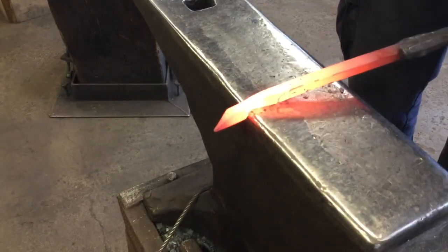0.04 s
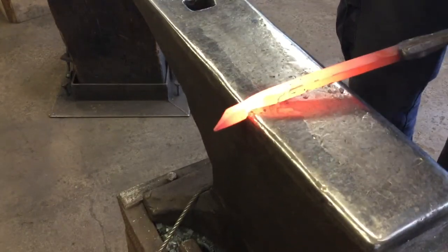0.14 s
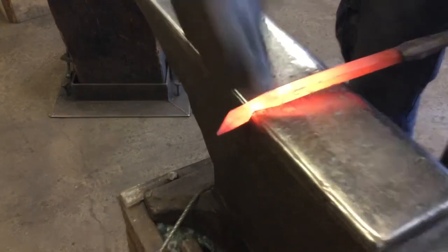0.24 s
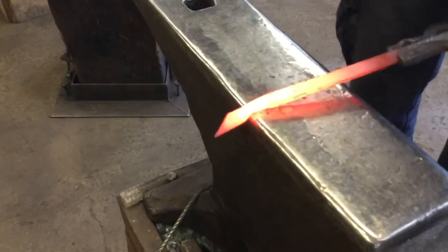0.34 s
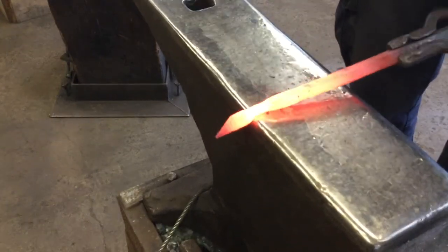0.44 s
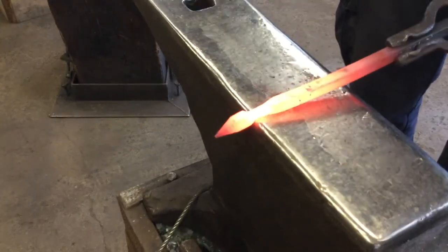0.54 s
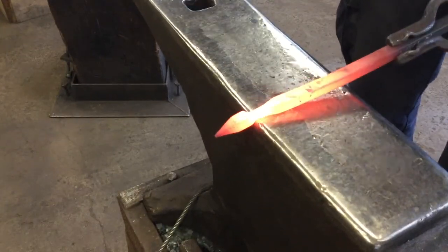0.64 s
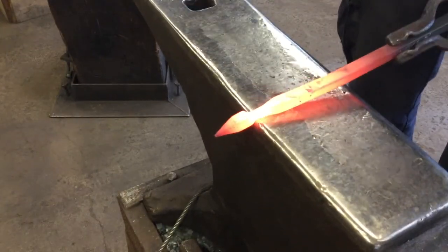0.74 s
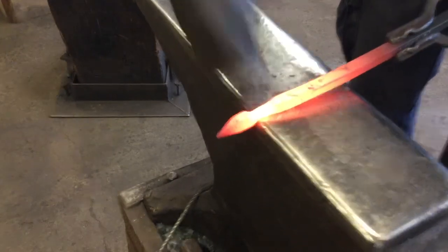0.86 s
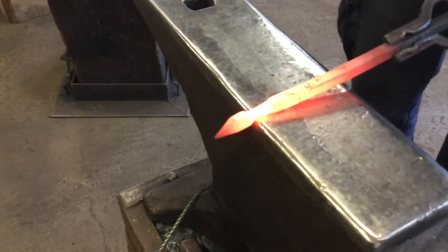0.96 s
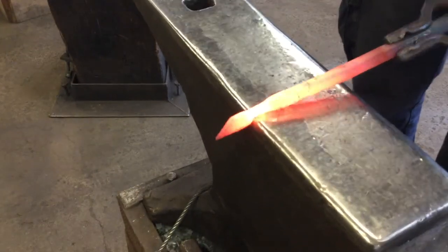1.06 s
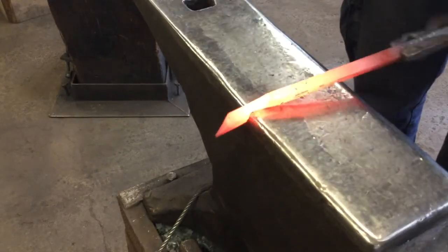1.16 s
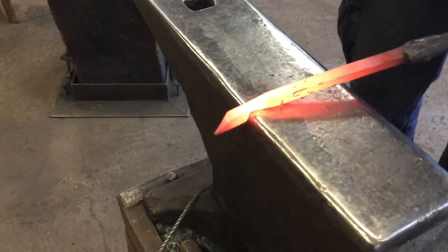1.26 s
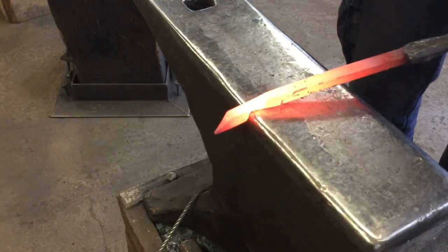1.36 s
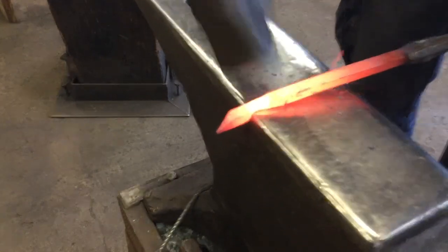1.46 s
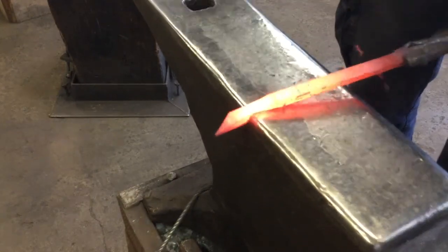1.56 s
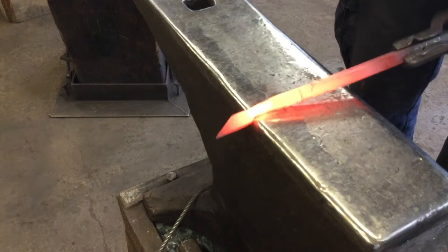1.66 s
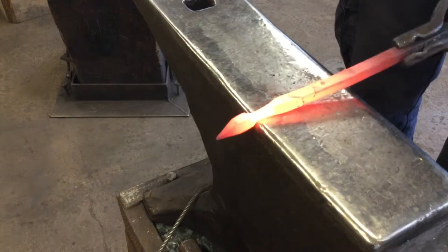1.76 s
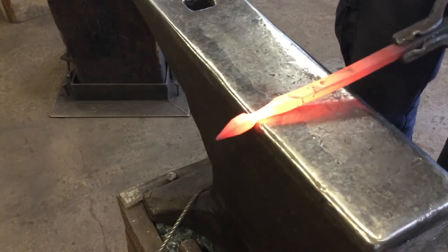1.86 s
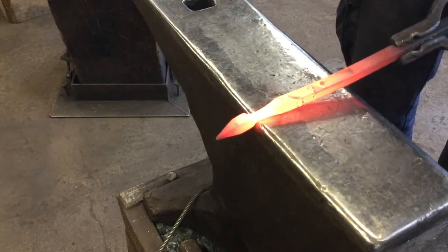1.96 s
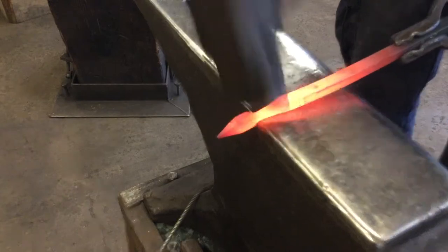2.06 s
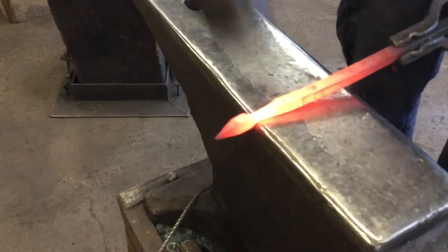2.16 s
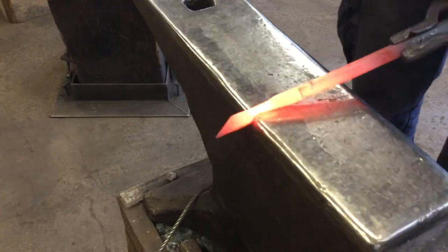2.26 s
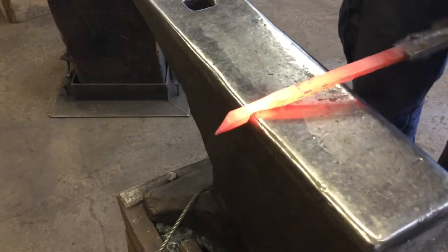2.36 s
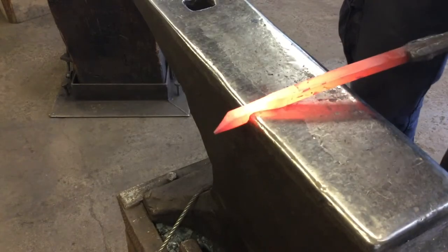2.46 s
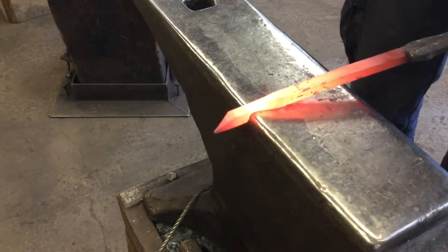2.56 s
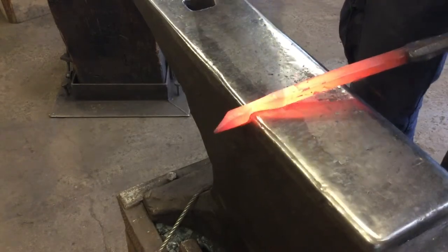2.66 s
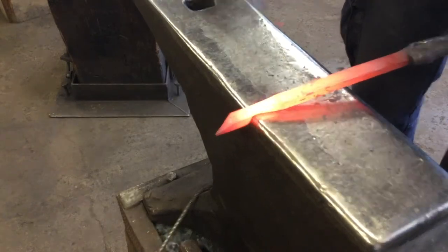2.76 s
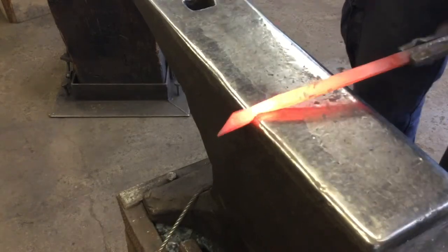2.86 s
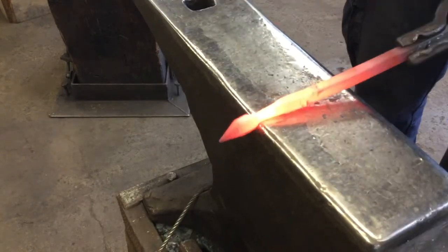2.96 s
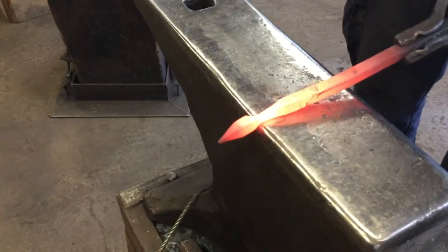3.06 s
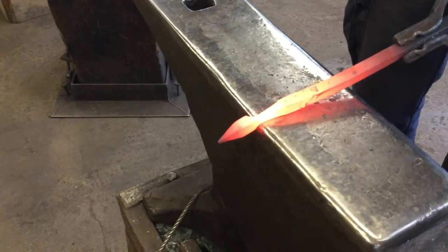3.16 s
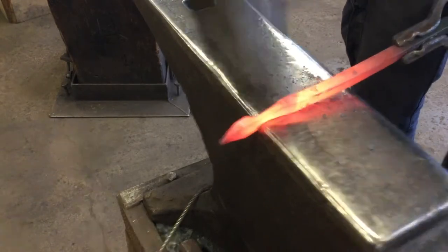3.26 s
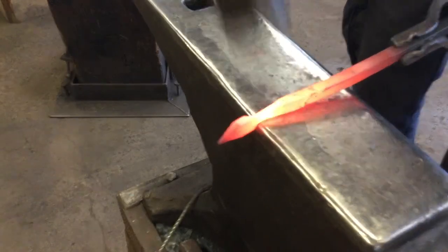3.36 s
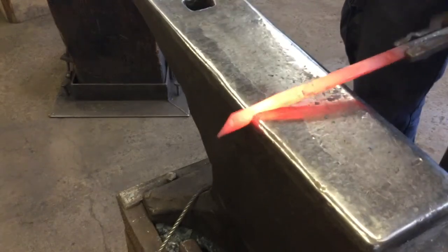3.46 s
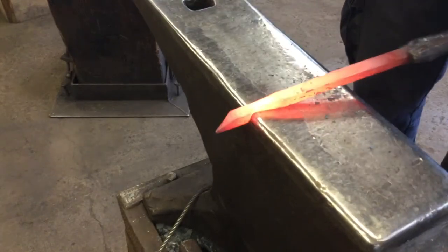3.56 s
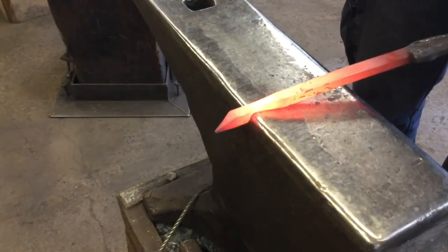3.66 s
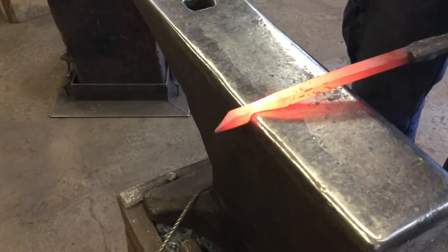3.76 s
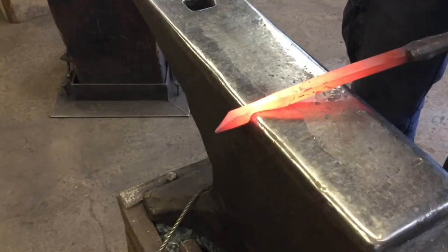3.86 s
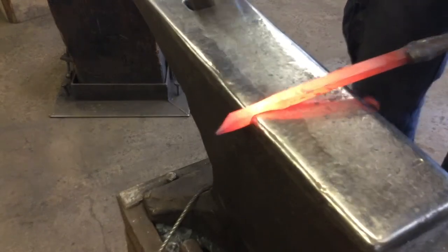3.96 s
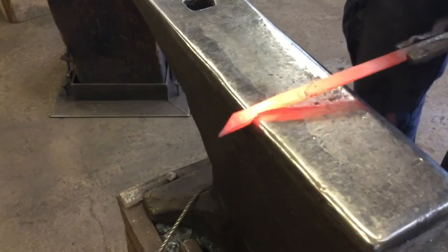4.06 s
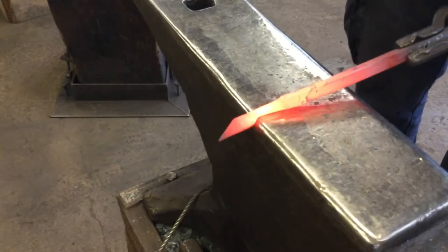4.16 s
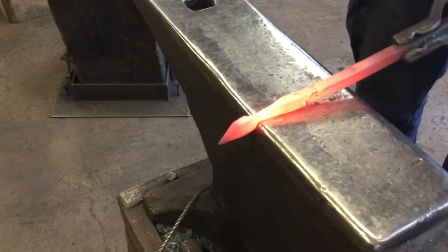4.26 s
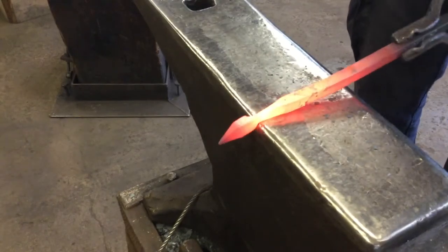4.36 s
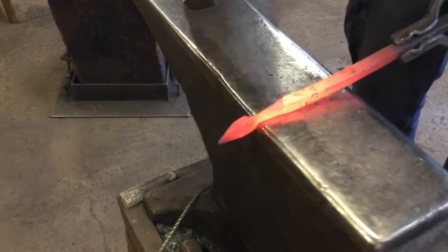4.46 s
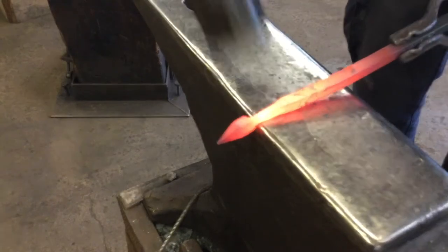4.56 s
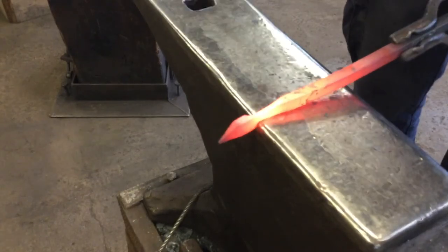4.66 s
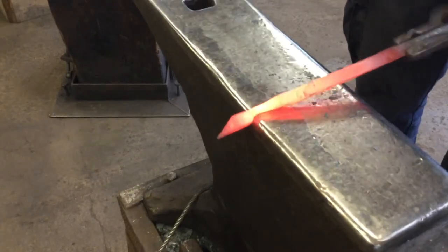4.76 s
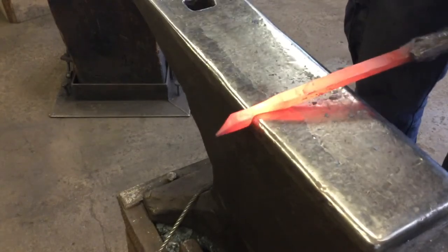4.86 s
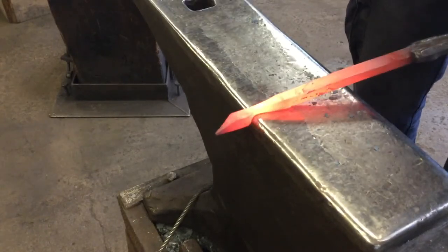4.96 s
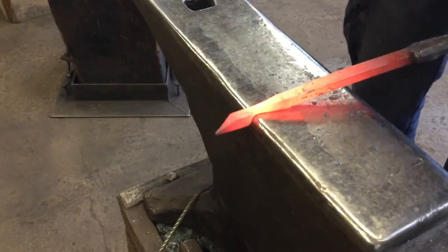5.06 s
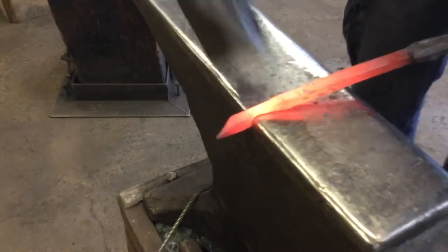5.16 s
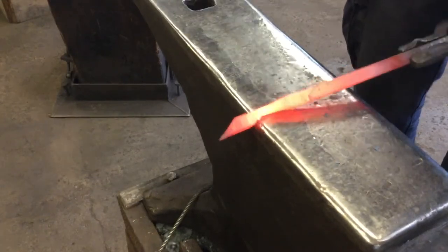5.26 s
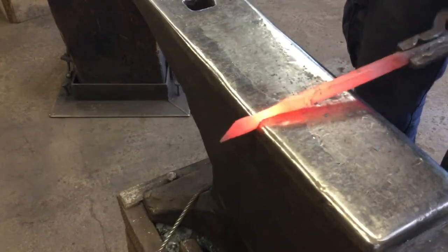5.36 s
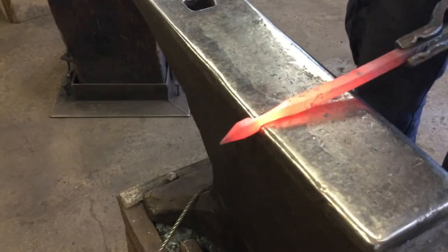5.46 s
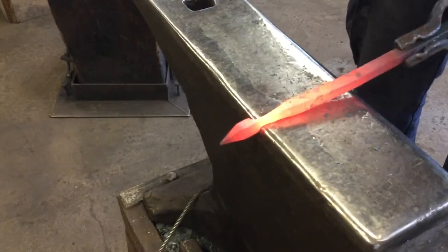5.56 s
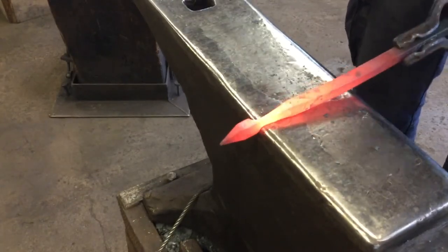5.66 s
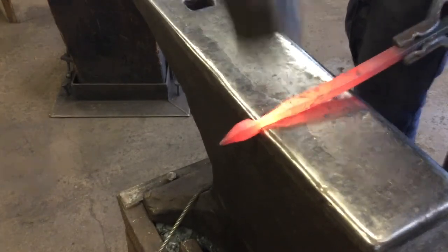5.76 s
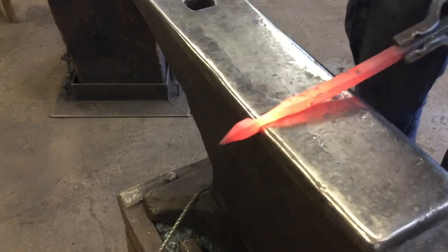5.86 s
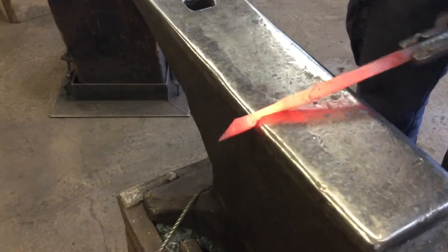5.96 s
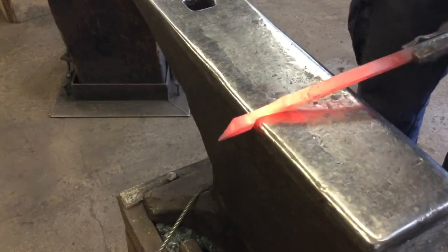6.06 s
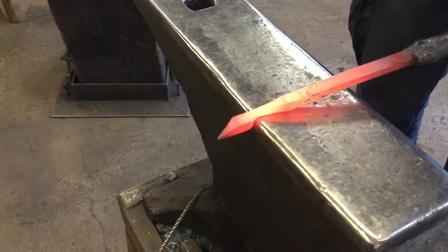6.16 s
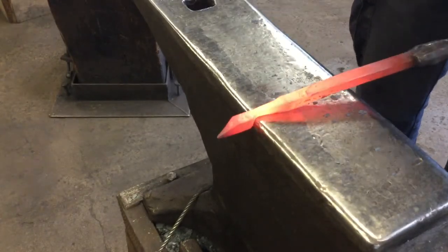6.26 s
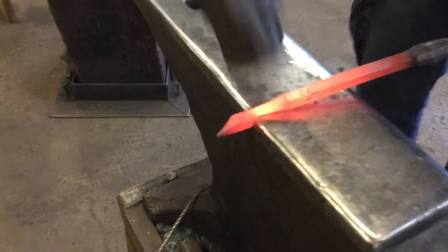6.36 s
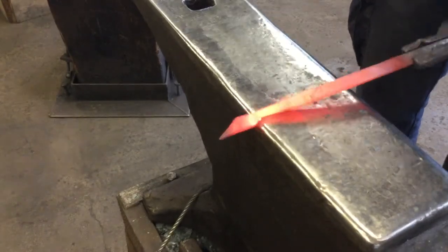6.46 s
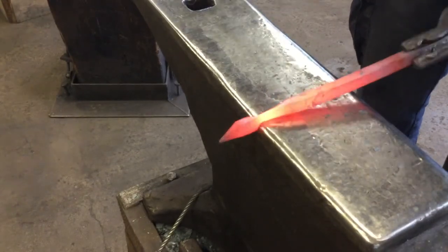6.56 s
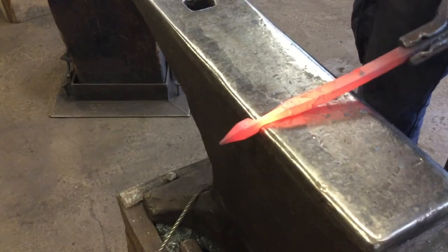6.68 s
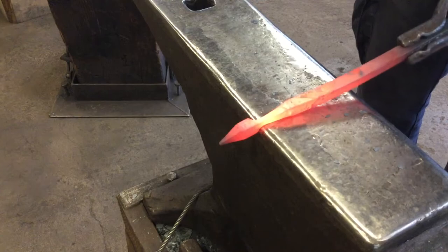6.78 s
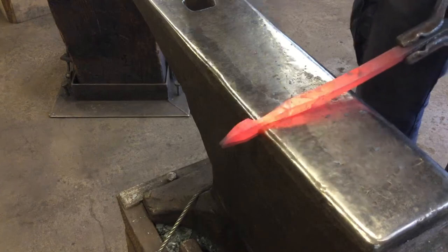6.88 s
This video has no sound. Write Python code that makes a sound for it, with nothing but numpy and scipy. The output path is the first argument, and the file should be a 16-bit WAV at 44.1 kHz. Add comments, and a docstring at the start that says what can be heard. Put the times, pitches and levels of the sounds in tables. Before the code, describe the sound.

A hand hammer pounds a hot steel bar on an anvil, eleven evenly spaced blows a little over half a second apart. Each lands with a sharp crack, a short clang, thin high rings and a thud from the stand. The hard workshop walls add a brief echo, and a blower hums low underneath. The close microphone overloads slightly on every hit.

```python
"""In a hard-walled workshop with a humming blower, a smith draws out a glowing steel bar on an anvil.
Each evenly paced hammer blow is an impact: the contact cracks and crunches the scale, the steel vibrates
freely in a short clang and thin high rings, and the stand thuds. The walls return it as echoes and
reverberation. The close microphone overloads on every blow, and its limiter ducks and recovers."""
import sys
import numpy as np
from scipy import signal
from scipy.fft import rfft, irfft, next_fast_len
from scipy.io import wavfile
from scipy.ndimage import minimum_filter1d

SR = 44100
rng = np.random.default_rng(int(sys.argv[2]) if len(sys.argv) > 2 else 0)


def transcribe(u):
    """Save the signal u as a 16-bit wav file named by the first command-line argument.

    u: samples, shape (n,) or (channels, n), limited to [-1, 1]; the rate is SR.
    q: integer samples, one column per channel.
    """
    v = np.clip(np.atleast_2d(u).T, -1, 1)
    q = np.round(v * 32767).astype(np.int16)
    wavfile.write(sys.argv[1], SR, q)


N = 305172
TIME = np.arange(N) / SR
LEAD_IN = SR  # samples before time zero, so that an earlier blow is still dying away


def from_db(db):
    """Amplitude ratio of a level in decibels."""
    return 10 ** (np.asarray(db) / 20)


def rms_one(x):
    """Normalisation to rms 1."""
    return x / np.sqrt(np.mean(x ** 2) + 1e-20)


def at_hz(points, hz, axis=1):
    """Interpolation of one table column over log frequency."""
    points = np.array(points)
    return np.interp(np.log(np.maximum(hz, 1)), np.log(points[:, 0]), points[:, axis])


def decay(t, t60):
    """Exponential damping, 60 dB down after t60."""
    return np.exp(-np.log(1000) * t / t60)


def bump(t, centre_s, spread_s):
    """Gaussian pulse of height 1."""
    return np.exp(-((t - centre_s) / spread_s) ** 2)


def swell(t, rise_s):
    """Gaussian onset from 0 to 1."""
    return 1 - bump(t, 0, rise_s)


def coloured(spectrum):
    """Spectral shaping of white noise: steady, rms 1."""
    size = next_fast_len(N)
    hz = np.arange(size // 2 + 1) * SR / size
    shaped = rfft(rng.standard_normal(size)) * from_db(at_hz(spectrum, hz))
    return rms_one(irfft(shaped, size)[:N])


def wavering(hz, width_hz):
    """Narrow-band noise: two passes through a resonance leave a tone of wandering strength and phase."""
    r = np.exp(-np.pi * width_hz / SR)
    resonator = [1 - r, 0, 0, 1, -2 * r * np.cos(2 * np.pi * hz / SR), r * r]
    return rms_one(signal.sosfilt([resonator, resonator], rng.standard_normal(N + SR))[SR:])


def whine(level_db=-54.5, lull_db=15.0, first_lull_s=0.5, lull_every_s=1.22):
    """Amplitude modulation: the blower's thin tone sinks in three evenly spaced lulls, then holds."""
    lulls = sum(bump(TIME, first_lull_s + k * lull_every_s, spread_s=0.38) for k in range(3))
    return from_db(level_db - lull_db * lulls) * wavering(hz=4187, width_hz=18)


# noise spectra of the blower's rumble and hiss: f/Hz, relative level/dB
RUMBLE_SPECTRUM = [(15, -45), (30, -33.5), (55, -3), (85, -2.5), (140, 1.5), (200, -4), (245, -13.5),
                   (350, -11), (450, -24), (700, -31), (1500, -33.5)]
HISS_SPECTRUM = [(1000, 0), (3000, -1), (7000, -10), (8700, -2.5), (10500, -10), (13300, -7), (15000, -22)]
# wavering tones of the blower: f/Hz, resonance width/Hz, rms level/dB
HUM_TONES = [(145.55, 9.4, -33), (301.6, 11, -48.5), (356, 13, -49.5), (2560, 7.2, -67)]


def blower(rumble_db=-23.5, rumble_edge_hz=1470, hiss_db=-57):
    """Superposition of broadband air noise, a rumble and a faint hiss, with narrow-band hum and whine."""
    low_pass = signal.butter(2, rumble_edge_hz, fs=SR, output="sos")
    rumble = from_db(rumble_db) * signal.sosfilt(low_pass, coloured(RUMBLE_SPECTRUM))
    hum = sum(from_db(db) * wavering(hz, width) for hz, width, db in HUM_TONES)
    hiss = from_db(hiss_db) * coloured(HISS_SPECTRUM)
    return rumble + hum + hiss + whine()


# reverberation of the shop: f/Hz, relative level/dB, T60/s
REVERBERATION = [(60, -19.5, 0.98), (159, -7.5, 0.53), (326, -9, 0.91), (910, -9.5, 0.8),
                 (1544, -22, 1.635), (1880, -15.5, 1.26), (2470, -15.5, 1.23), (4000, -19.5, 1.2),
                 (7140, -27.5, 0.94), (11000, -6.5, 0.34), (14000, -22, .28)]
# reflections from floor and near walls, a side wall, and twice from the far end:
# delay t/s, spread/s, level above the plain decay/dB
REFLECTIONS = [(0, 0.025, 7), (.063, 0.0036, 6), (.1, 0.027, 3.5), (.24, 0.055, 7), (.4, .03, 4.5)]


def workshop(x, onset_s=0.0029):
    """Convolution with the room's impulse response: dense reflections, each band dying at its own rate."""
    t = TIME[:SR]
    edges_hz = np.geomspace(40, 18000, 19)
    white, tail = rng.standard_normal((2, SR)), 0
    for k, (low, high) in enumerate(zip(edges_hz, edges_hz[1:])):
        hz = np.sqrt(low * high)
        band = signal.sosfilt(signal.butter(2, [low, high], "band", fs=SR, output="sos"), white[k % 2])
        db, t60 = at_hz(REVERBERATION, hz), at_hz(REVERBERATION, hz, axis=2)
        tail = tail + band * from_db(db) * decay(t, t60)
    echoes_db = sum(db * bump(t, delay, spread) for delay, spread, db in REFLECTIONS)
    response = tail * from_db(echoes_db) * swell(t, onset_s) * np.sqrt(10 / SR)
    return signal.fftconvolve(x, response)[:len(x)]


CLANG_HZ, OVERTONE_HZ = 1475, 3150
# modes of steel and stand, in groups that a blow drives together: f/Hz, level/dB, T60/s
MODES = { "clang": [(CLANG_HZ, 10.67, 0.089), (1855, -12, 0.13), (4355, -8, .07)],
         "overtone": [(OVERTONE_HZ, -22.5, 0.24)], "thud": [(94, -0.5, 0.079), (180.6, -0.5, 0.069),
         (334, 0, 0.049), (548, -18, 0.09)], "face": [(6873, -21, .24), (6485, -28, .16)],
         "hammer": [(11404, -16.5, .23), (10992, -24, .18)], "ping": [(12950, -33.5, .6)],
         "edge": [(5465, -29, .22), (4890, -35, .22)], }


def ringing(group, t, spread_db):
    """Free vibration of damped modes; every blow shares its energy among them a little differently."""
    return sum(from_db(db + rng.normal(0, spread_db)) * np.sin(2 * np.pi * hz * t) * decay(t, t60)
               for hz, db, t60 in MODES[group])


# noise spectra of the contact, the crushed scale and the anvil on its stand: f/Hz, relative level/dB
CRACK_SPECTRUM = [(100, 16.5), (400, 7.5), (800, -2.5), (1600, 10), (2500, -5.5), (5000, -7.5),
                  (10000, -13), (16000, -7)]
CRUNCH_SPECTRUM = [(200, 16.5), (800, 8.5), (1700, 12.5), (3000, 4.5), (6000, -1.5), (9500, -4),
                   (11300, -16), (12500, -23), (16000, -25)]
KNOCK_SPECTRUM = [(12, -41), (30, 4), (70, -3), (150, 5.5), (320, 0), (500, -24.5), (1000, -28),
                  (4000, -65)]
# sensitivity of each group of steel modes: level/dB per dB of dullness, of brightness, of ping
SENSITIVITY = {"clang": (-0.16, 0, 0), "overtone": (0.48, 0.35, 0), "face": (1.3, 0.53, 0),
               "hammer": (-1.6, 1, 0), "ping": (0, 0, 0.95), "edge": (-1.5, 0.14, 0)}
# blows; a dull one drives the stand harder: t/s, force level/dB, dullness/dB, brightness/dB, ping/dB
HAMMER_BLOWS = [(-0.4, -5.5, 0, 0, 0), (0.2133, 0, 2.5, 3, -14), (0.8271, -1, -0.1, 2.5, 0),
                (1.4464, -0.85, 1, 2.5, -9), (2.0539, -1.5, -3, 2.5, -5), (2.6636, 0.1, -0.2, 3.5, -7),
                (3.2768, -0.2, -1.5, 2.5, -4), (3.8892, -1.3, 1, -0.5, -4), (4.4906, -1.9, 0.9, 0, -1),
                (5.1012, -1, -1.7, -6, -7), (5.6961, 0.9, -0.1, 5, 6.5), (6.3185, -1.5, 0.5, 1, -1)]


def hammering(crack_db=6.0, crunch_db=-18.5, knock_db=2.0, squash_s=0.0053, stand_rise_s=0.0024):
    """Impact excitation: a blow cracks, crushes scale, rings the steel and knocks anvil against stand."""
    out, t = np.zeros(LEAD_IN + N + SR), TIME[:SR]
    noises = [coloured(spectrum) for spectrum in (CRACK_SPECTRUM, CRUNCH_SPECTRUM, KNOCK_SPECTRUM)]
    for start_s, force_db, dull_db, bright_db, ping_db in HAMMER_BLOWS:
        span = LEAD_IN + round(start_s * SR) + np.arange(SR)
        crack, crunch, knock = (noise[span % N] for noise in noises)
        crack *= from_db(crack_db) * decay(t, t60=0.039)
        crunch *= from_db(crunch_db) * decay(t, t60=0.45)
        knock *= from_db(knock_db) * decay(t, t60=0.051)
        steel = sum(from_db(np.dot(slopes, (dull_db, bright_db, ping_db))) * ringing(group, t, spread_db=2)
                    for group, slopes in SENSITIVITY.items())
        steel *= swell(t, squash_s)  # the soft bar spreads the push over some milliseconds
        thud = ringing("thud", t, spread_db=1.5)
        stand = from_db(dull_db) * (knock - thud) * swell(t, stand_rise_s)
        out[span] += from_db(force_db) * (crack + crunch + steel + stand)
    return out


def scene():
    """Superposition of the anvil's direct sound, its reverberant field and the blower."""
    blows = hammering()
    forging = (blows + workshop(blows))[LEAD_IN:LEAD_IN + N]
    return (forging + blower())[None]


def limiter(x, threshold_db=8.0, depth_db=3.5, hold_s=0.17, release_db_per_s=32.0, attack_s=0.002):
    """Automatic gain control: loud peaks pull the gain down; it is held a moment, then climbs back."""
    excess_db = np.clip(20 * np.log10(np.abs(x) + 1e-9) - threshold_db, 0, depth_db)
    size = 2 * int(hold_s * SR / 2) + 1
    held_db = -minimum_filter1d(-excess_db, size, origin=size // 2, mode="constant")
    ramp_db = release_db_per_s * TIME
    reduction_db = np.maximum.accumulate(held_db + ramp_db) - ramp_db
    r = np.exp(-1 / (attack_s * SR))
    return x * from_db(-signal.lfilter([1 - r], [1, -r], reduction_db))


def record(dry, bass_hz=38.4, cutoff_hz=15600, ceiling=0.73, hardness=6):
    """Saturation in a band-limited microphone: blows outrun the limiter, so their peaks are flattened."""
    picked_up = signal.sosfilt(signal.butter(2, bass_hz, "high", fs=SR, output="sos"), dry[0])
    oversampled = signal.resample_poly(limiter(picked_up), 2, 1)
    saturated = oversampled / (1 + np.abs(oversampled / ceiling) ** hardness) ** (1 / hardness)
    low_pass = signal.firwin(161, cutoff_hz, window=("kaiser", 9), fs=SR)
    return signal.fftconvolve(signal.resample_poly(saturated, 1, 2), low_pass, "same")[None]


dry = scene()
out = record(dry)
transcribe(out)
```